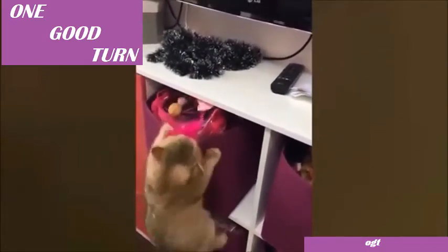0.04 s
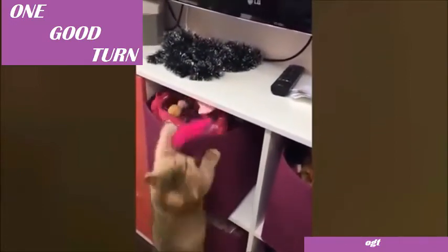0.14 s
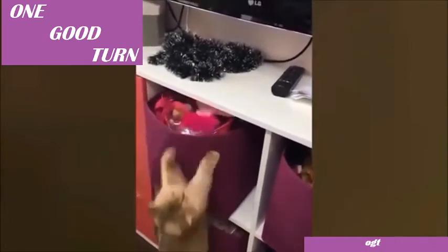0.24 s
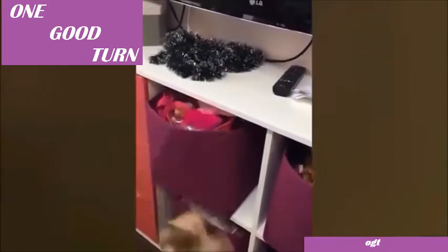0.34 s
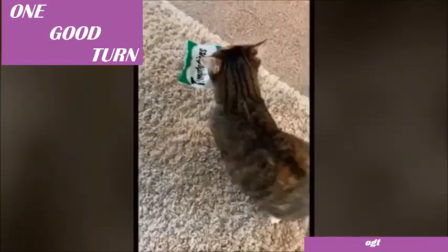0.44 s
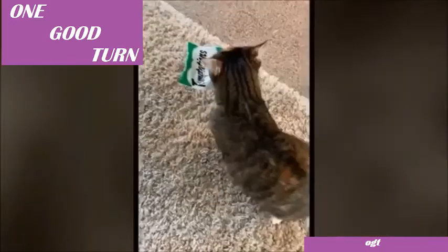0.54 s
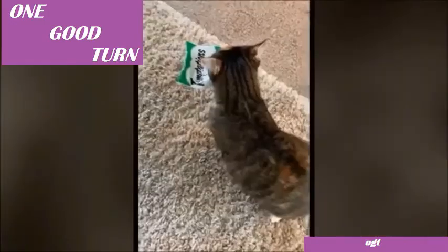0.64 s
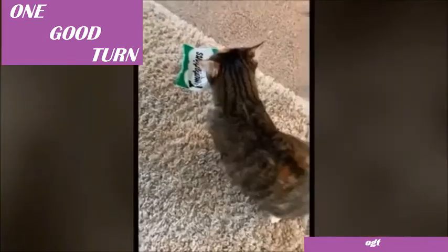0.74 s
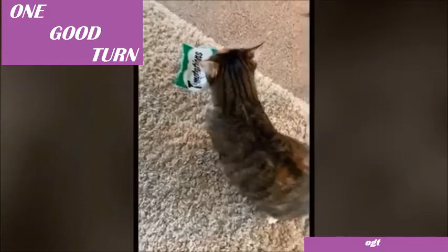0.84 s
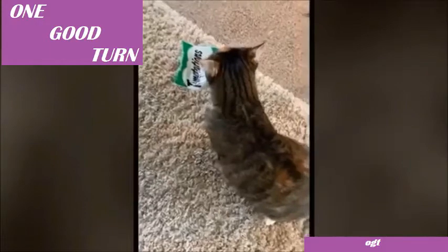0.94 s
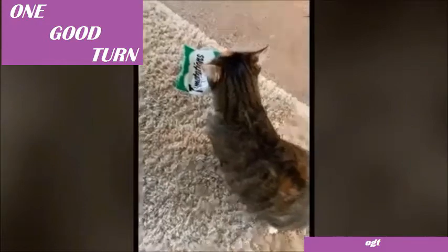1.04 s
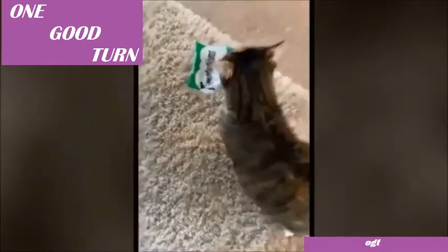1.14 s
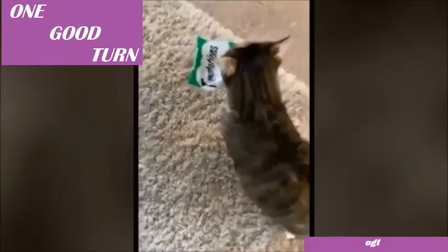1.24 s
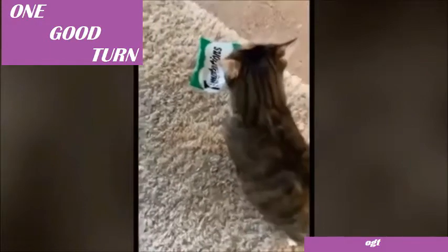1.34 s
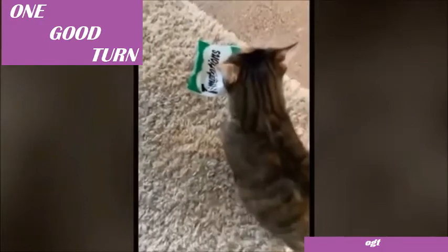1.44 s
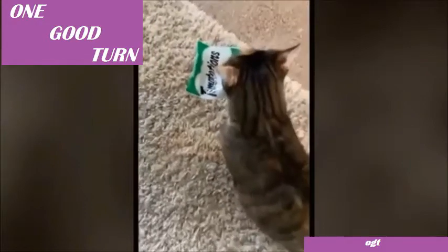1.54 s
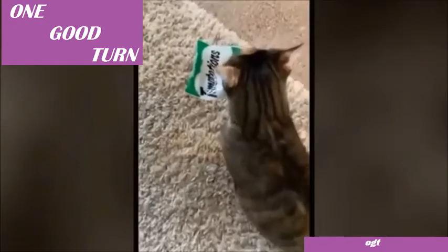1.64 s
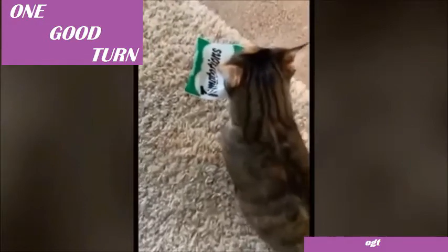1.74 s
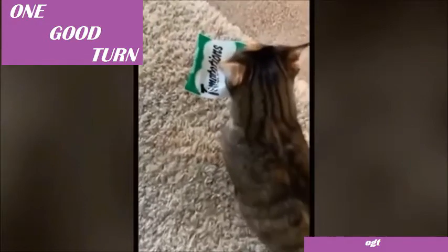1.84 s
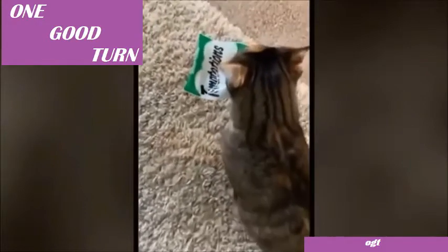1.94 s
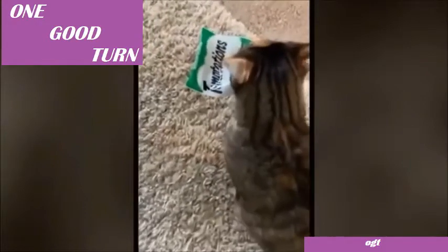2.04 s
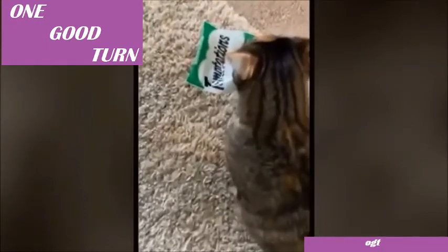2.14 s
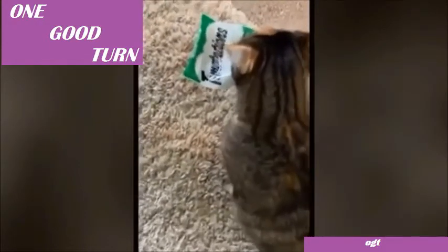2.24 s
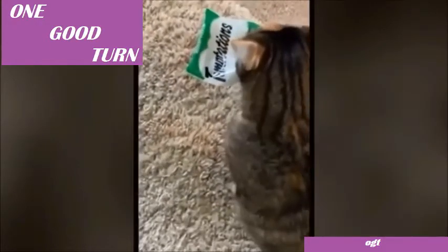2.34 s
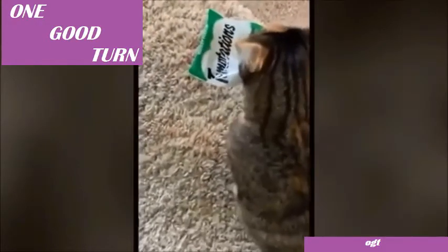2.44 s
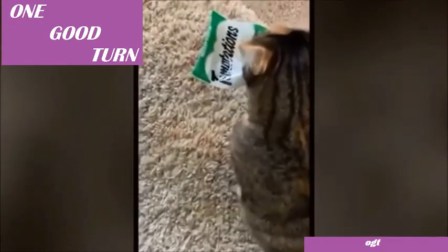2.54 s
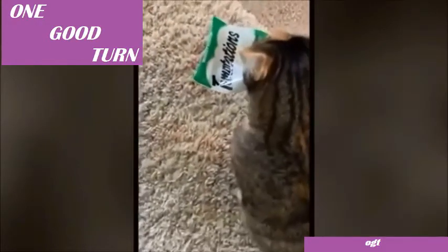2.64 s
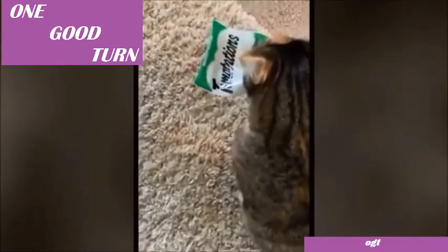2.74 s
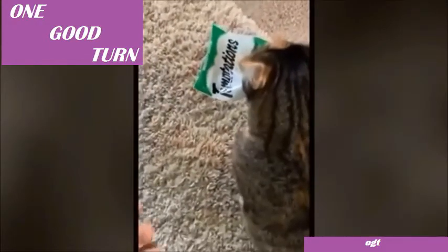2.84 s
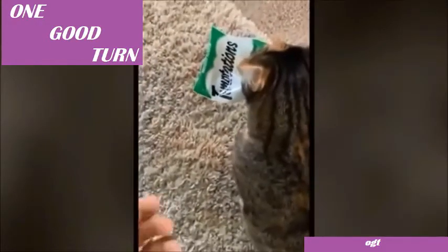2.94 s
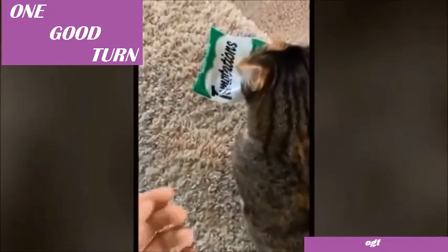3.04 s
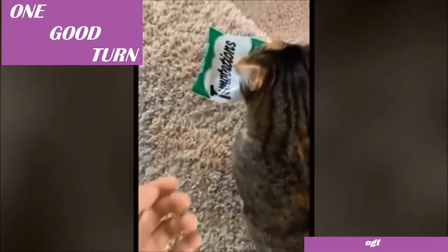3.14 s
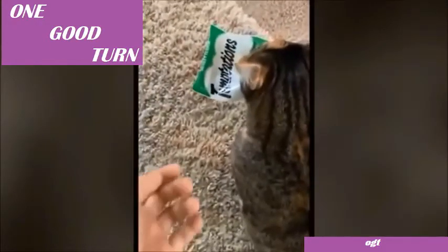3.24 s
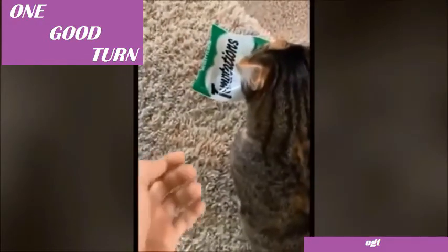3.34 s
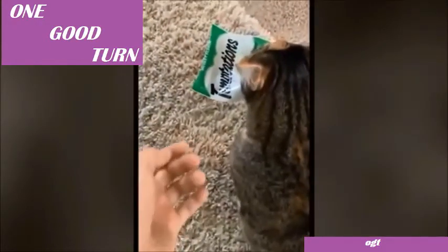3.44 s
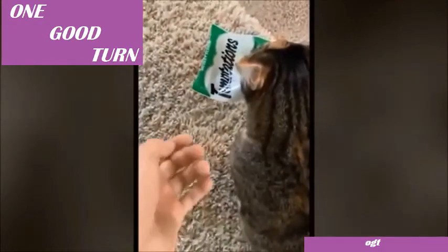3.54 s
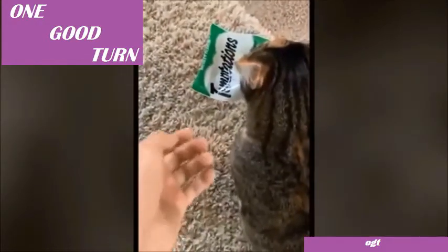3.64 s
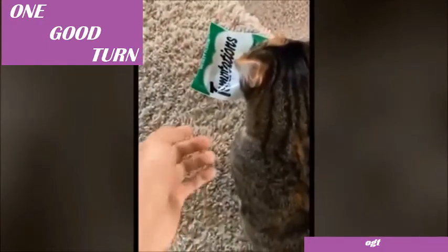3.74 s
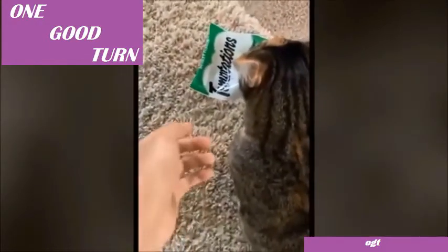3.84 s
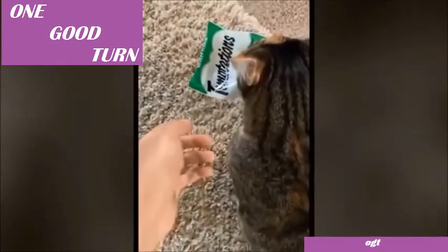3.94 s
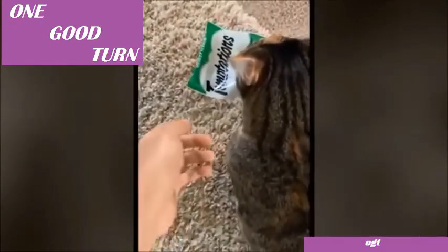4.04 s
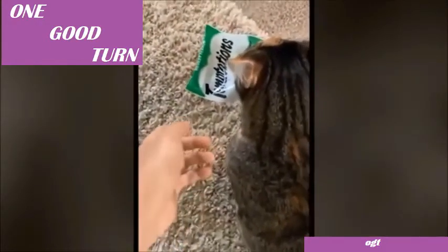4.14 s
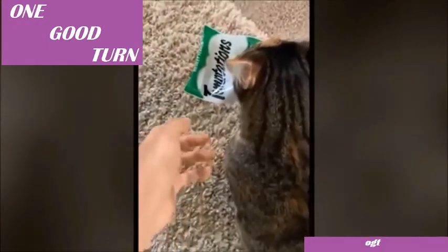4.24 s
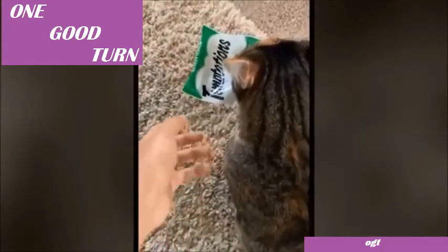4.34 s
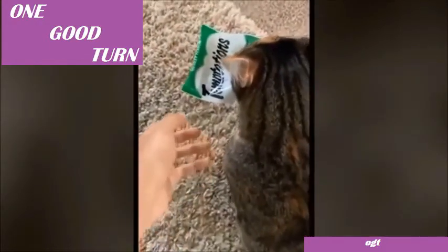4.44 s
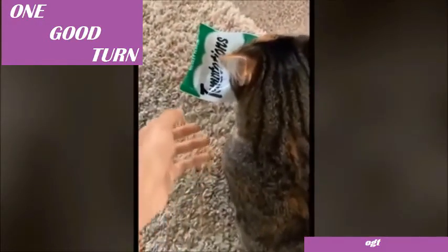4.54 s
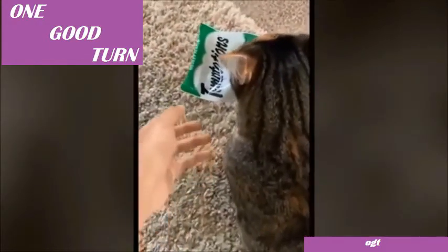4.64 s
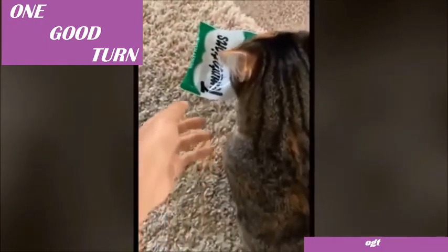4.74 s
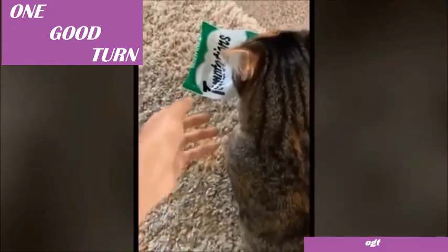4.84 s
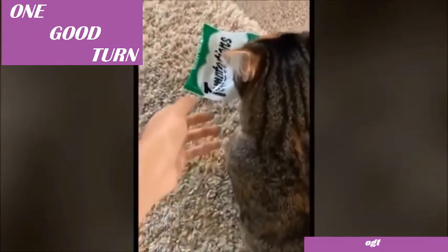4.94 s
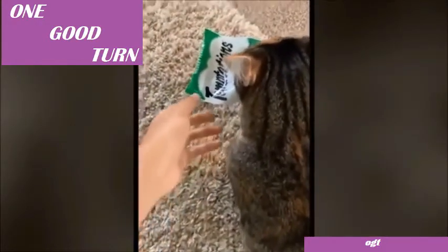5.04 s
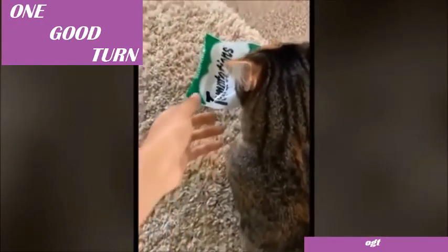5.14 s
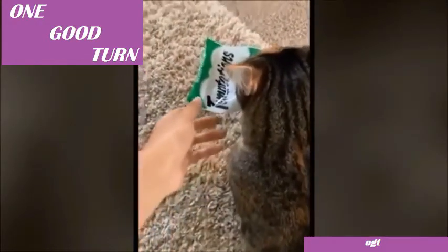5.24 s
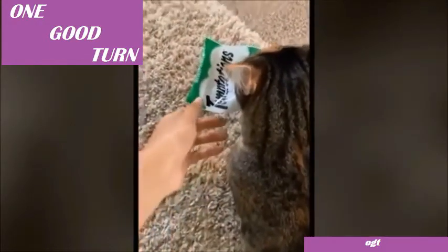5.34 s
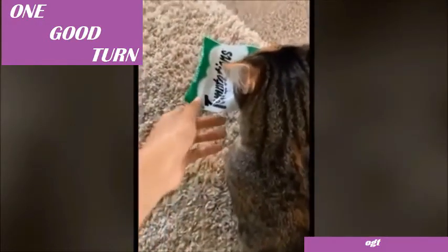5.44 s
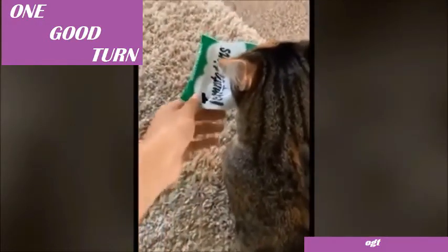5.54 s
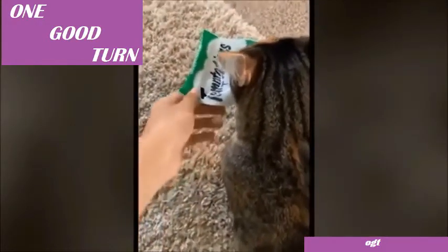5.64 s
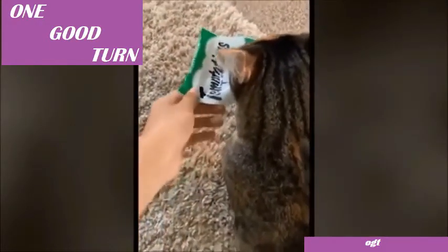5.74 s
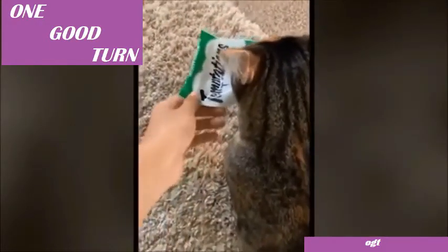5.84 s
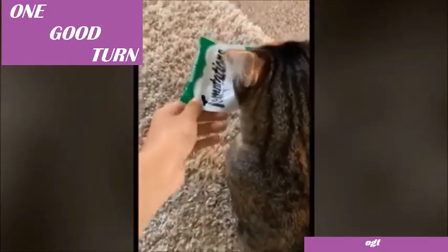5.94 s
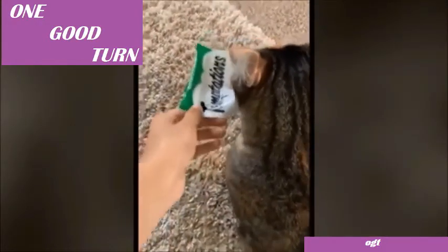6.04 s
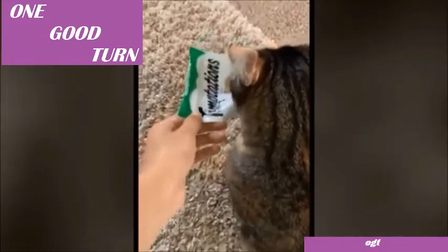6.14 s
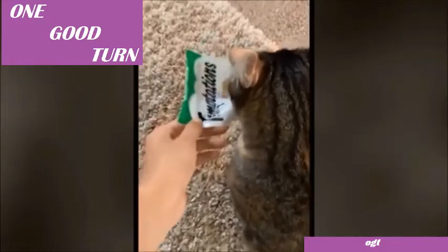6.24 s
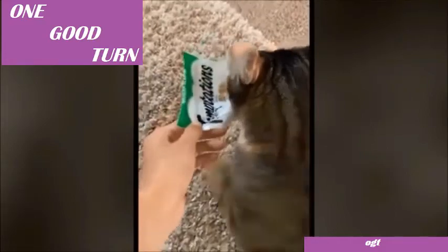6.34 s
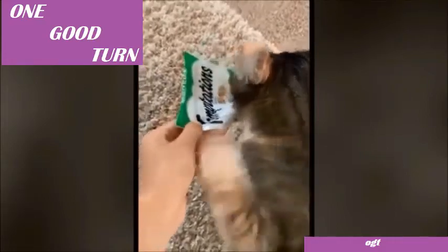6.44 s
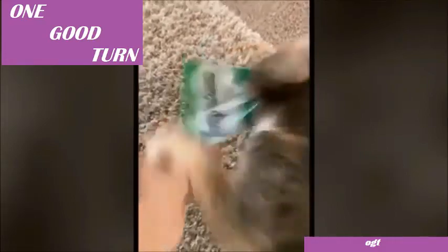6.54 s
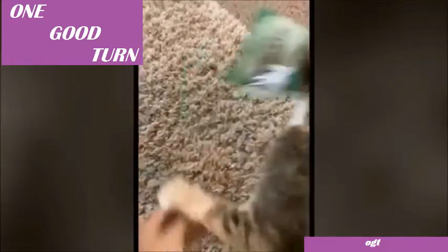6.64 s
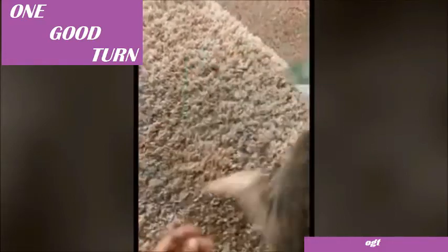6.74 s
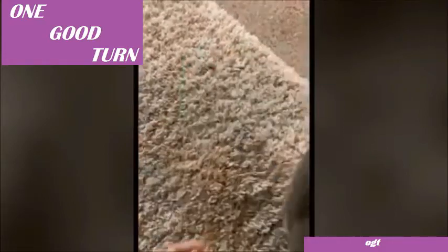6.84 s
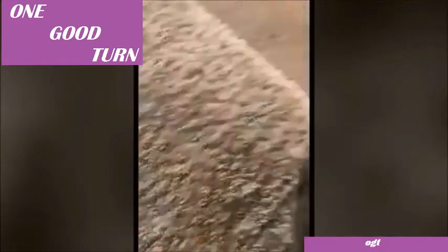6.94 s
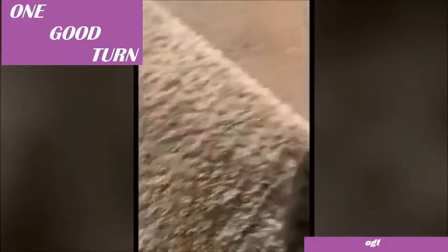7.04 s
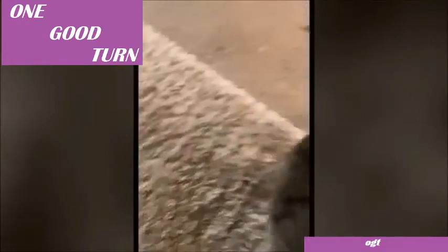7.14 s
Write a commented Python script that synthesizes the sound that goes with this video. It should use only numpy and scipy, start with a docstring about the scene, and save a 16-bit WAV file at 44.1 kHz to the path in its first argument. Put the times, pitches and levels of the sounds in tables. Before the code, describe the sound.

Silence until about 0.5 s, when sound cuts in abruptly: faint low house rumble, thin hiss, and a cat's growl already under way. Close and dry in a small soft room, the growl is low, throaty and buzzing, with a rapid rattling pulse and a little airy snarl. It holds nearly level, with brief upward catches around 2.2, 2.4 and 3 s, sinking slightly after 3.4 s. At 4.4 s it jumps up into a weak, wavering closed-mouth groan, gone by 5 s. Near-quiet follows, with a dull fingertip knock on plastic at 5.4 s. From 5.9 s the bag snaps and rustles while a rougher, angrier growl rises, peaking around 6.35 s. At 6.4 to 6.5 s a swat crunches the bag in a dense, bright crackle with a soft thump. Another tiny thump and ticks follow near 6.6 s, as the growl turns irregular and moaning, weakening towards 7 s.

```python
"""Half a second of silence, then a cat's long low growl over faint rumble and hiss; it thins into a groan.
A hand rustles and knocks on a plastic bag; a rougher growl rises and the cat swats the bag with a crunch.
Growl: a hum of three partials plus two slaps a cycle that ring the throat; flapping adds irregular beats.
Bag: dispersive snaps and a knock, a swarm of creases ringing the bag, and decaying sines for two thumps.
Decaying noise makes the small soft room; shaped noise makes the rumble and hiss."""
import sys
import numpy as np
from scipy import signal
from scipy.fft import rfft, irfft
from scipy.io import wavfile

SR = 44100
rng = np.random.default_rng(int(sys.argv[2]) if len(sys.argv) > 2 else 0)


def dump(signal):
    """Clip the signal to [-1, 1] and save it as 16-bit WAV at the path in sys.argv[1]."""
    limited = np.clip(np.atleast_2d(signal).T, -1, 1)
    pcm = np.round(limited * 32767).astype(np.int16)
    wavfile.write(sys.argv[1], SR, pcm)


N = 317520
TIME = np.arange(N) / SR
BINS = np.fft.rfftfreq(N, 1 / SR)


def gain_of(db):
    """Logarithmic level: 20 dB is a factor of ten in amplitude."""
    return 10 ** (np.asarray(db) / 20)


def evened(x):
    """Power normalization: scales a signal to rms 1."""
    return x / np.sqrt(np.mean(x ** 2) + 1e-20)


def read(points, hz):
    """Spectral interpolation: reads a table in straight lines on a log-frequency axis."""
    f, value = np.transpose(points)
    return np.interp(np.log(hz + 1), np.log(f + 1), value)


def follow(rows):
    """Piecewise-linear control: joins each column after the time column by straight lines."""
    s, *columns = np.transpose(rows)
    return [np.interp(TIME, s, column) for column in columns]


def level(s, db):
    """Amplitude contour: a dB curve as gain, fading to zero within 10 ms outside its span."""
    outside_s = np.maximum(s[0] - TIME, TIME - s[-1])
    return gain_of(np.interp(TIME, s, db)) * np.clip(1 - outside_s * 100, 0, 1)


def envelope(start, end, attack_s, release_s, sag_db_per_s=0):
    """Gating: linear attack and release around a level that changes evenly in dB."""
    gate = np.clip(np.minimum((TIME - start) / attack_s, (end - TIME) / release_s), 0, 1)
    return gate * gain_of(sag_db_per_s * (np.clip(TIME, start, end) - start))


def add(mix, s, sound):
    """Superposition: mixes a sound in at time s."""
    part = mix[round(s * SR):][:len(sound)]
    part += sound[:len(part)]


def noise(colour):
    """Spectral shaping: steady noise of a given spectrum, rms 1."""
    return evened(irfft(rfft(rng.standard_normal(N)) * gain_of(read(colour, BINS)), N))


def wander(rate_hz):
    """Low-pass noise: random drift, mostly below the given rate, rms 1."""
    return evened(irfft(rfft(rng.standard_normal(N)) / (1 + (BINS / rate_hz) ** 4), N))


def ring(colour, tilt_db=0, size=4096):
    """Minimum phase: the causal impulse response of a spectrum, tilted in dB per octave, energy 1."""
    hz = abs(np.fft.fftfreq(size, 1 / SR))
    db = np.maximum(read(colour, hz), -80) + tilt_db * np.log2(1 + hz / 1000)
    log_gain = np.log(gain_of(db))
    # the Hilbert transform of the log gain supplies the phase
    response = np.fft.ifft(np.exp(np.conj(signal.hilbert(log_gain)))).real[:size // 2]
    return response / np.linalg.norm(response)


def colour_with(x, colour):
    """Linear filtering: convolves a sound with the response of a spectrum."""
    return signal.oaconvolve(x, ring(colour))[:N]


def resonate(x, hz, width_hz):
    """Moving resonance: shifts the curve hz down to zero, low-passes, and shifts it back; peak gain 1."""
    turn = np.exp(2j * np.pi * np.cumsum(hz) / SR)
    r = np.exp(-np.pi * width_hz / SR)
    return 2 * (turn * signal.lfilter([1 - r], [1, -r], x / turn + 1e-18)).real


# room decay: hz [Hz], t60 [s]
ROOM_DECAY = [(150, 1), (1000, 0.25), (4000, 0.33), (14000, 0.091)]


def room(x):
    """Reverberation: convolution with a diffuse noise tail whose bands decay at their own speed."""
    hz, t, z = signal.stft(rng.standard_normal(SR // 2), SR, nperseg=256)
    decay = np.exp(-np.log(1000) * t / read(ROOM_DECAY, hz)[:, None])
    tail = signal.istft(z * decay, SR, nperseg=256)[1]
    tail[:SR // 200] = 0  # the tail starts 5 ms after the sound
    tail = signal.sosfilt(signal.butter(2, 330, "high", fs=SR, output="sos"), tail)
    return signal.oaconvolve(x, tail / np.linalg.norm(tail))[:N]


# colours of the rumble and of the hiss: hz [Hz], relative_level_db [dB]
ROOM_TONE = [(15, -68), (25, -20), (75, 2.5), (100, -7), (157, -8.5), (190, -19), (366, -20), (528, -26.5),
             (1000, -25.5), (1780, -32.5), (6000, -46), (15000, -59)]
HISS_COLOUR = [(2350, 0), (4000, -3), (4700, -5.5), (6800, -6), (8000, -12.5), (9000, -9), (12900, -10),
               (14500, -10), (15500, -31)]
# course of the hiss: start_s [s], relative_level_db [dB]
HISS = [(.52, -69.5), (.68, -65), (.82, -73.5), (1.03, -65), (1.197, -72.5), (2.03, -72.5), (2.42, -63.5),
        (2.7, -68.5), (3.2, -65.5), (4.499, -74), (5.0, -71.5), (5.549, -76.5), (6.78, -66.5), (7.0, -64),
        (7.2, -61)]


def background(rumble_db=-57, hiss_db=2.5):
    """Stationary and modulated noise: the low rumble of the house and a fine hiss of changing level."""
    hiss = gain_of(hiss_db) * level(*np.transpose(HISS)) * noise(HISS_COLOUR)
    return gain_of(rumble_db) * noise(ROOM_TONE) + hiss


def pulses(turns, spread_db):
    """Periodic excitation: one click of uneven strength at every whole turn."""
    return np.diff(np.floor(turns), prepend=np.floor(turns[0])) * gain_of(spread_db * wander(115))


def slap(turns, rough, spread_db, puff_turns):
    """Glottal excitation: once a cycle the folds slap unevenly and let out a decaying puff of air."""
    puffs = evened(np.exp(-(turns % 1) / puff_turns) * rng.standard_normal(N))
    # the slap itself is soft, so the top of the treble is nearly all air
    soft = signal.butter(2, 2300, fs=SR, output="sos")
    clicks = signal.sosfilt(soft, evened(pulses(turns, 0)))
    rough = np.clip(rough, 0, 1)
    return ((1 - rough) * clicks + rough * puffs) * gain_of(spread_db * wander(126))


# lips draw back in the long growl: start_s [s], level_db [dB against the sharp slap before its gain],
# resonance_hz [Hz]
SNARL = [(0.522, -18.5, 3680), (1.25, -14, 3670), (1.45, -7.5, 3560), (2.25, -4, 3475), (2.45, -17, 3400),
         (2.7, -15.5, 3640), (3.2, -16, 3580), (3.6, -23, 3610), (4.457, -13, 3610)]
# colour of the air between the teeth: hz [Hz], relative_level_db [dB]
LIPS_COLOUR = [(1500, -14.5), (2100, -13.5), (2450, -8), (3100, -17.5), (3800, -13), (4200, -35),
               (8000, -68)]


def snarl(turns, slap_db, ring_db=15, width_hz=75):
    """Turbulence: pulsing air through bared teeth excites a treble resonance that drifts with the lips."""
    s, db, hz = np.transpose(SNARL)
    air = colour_with(slap(turns, .5, slap_db, .35), LIPS_COLOUR)
    ringing = resonate(air, np.interp(TIME, s, hz), width_hz)
    return level(s, db) * evened(air + gain_of(ring_db) * ringing)


# how strongly the body radiates a partial of the hum: hz [Hz], radiation_db [dB]
BODY = [(110, -41.5), (123, -44), (136, -40.5), (190, -40.5), (233, -40.5), (248, -44), (275, -45.5),
        (300, -52), (380, -68)]
# a wider mouth strengthens both slaps: dB per Hz of mouth resonance above its rest
MOUTH_REST_HZ, SHARP_DB_PER_HZ, DULL_DB_PER_HZ = 1079, 0.0253, 0.0177
# slow pitch waver: rms share of pitch, top rate in Hz
WAVER, WAVER_HZ = .004, 10


def growl(pitch, effort_db, lean_db, rasp_db, mouth, uppers, throat, jitter, shimmer, rough, slap_db,
          sharp_spread_db, puff_turns, dull_turn, sharp_turn, mouth_db, sharp_db, third_db, flutter_db,
          width_hz, split_hz=1150, upper_width_hz=38):
    """Source and filter: slow folds hum in three partials and slap twice a cycle, ringing the throat."""
    # lean_db favours the octave over the fundamental
    low = gain_of(effort_db - lean_db + read(BODY, pitch))
    octave = gain_of(effort_db + lean_db + read(BODY, 2 * pitch))
    unevenness = 1 + jitter * wander(55) + WAVER * wander(WAVER_HZ)
    turns = np.cumsum(pitch * unevenness) / SR
    hum = low * np.cos(2 * np.pi * turns) * (1 + shimmer * wander(55))
    hum += octave * np.sin(4 * np.pi * turns) * (1 + shimmer * wander(50))
    hum -= gain_of(third_db) * octave * np.cos(6 * np.pi * turns)

    # the dull slap rings the low throat and the mouth
    dull = colour_with(slap(turns - dull_turn, rough, slap_db, puff_turns), throat)
    dull = signal.sosfilt(signal.butter(3, split_hz, fs=SR, output="sos"), dull)
    dull = evened(dull + gain_of(mouth_db) * resonate(dull, mouth, width_hz))

    # the sharp slap carries more air and rings the upper resonances (Hz, dB)
    sharp = colour_with(slap(turns - sharp_turn, rough + .1, sharp_spread_db, puff_turns), throat)
    sharp = signal.sosfilt(signal.butter(2, split_hz, "high", fs=SR, output="sos"), sharp)
    ringing = sum(gain_of(db) * resonate(sharp, hz, upper_width_hz) for hz, db in uppers)
    sharp = evened(sharp + ringing)
    sharp += snarl(turns - sharp_turn, sharp_spread_db)

    opening_hz = mouth - MOUTH_REST_HZ
    sharp *= gain_of(sharp_db + SHARP_DB_PER_HZ * opening_hz)
    dull *= gain_of(DULL_DB_PER_HZ * opening_hz)

    # uneven cycles fill the gaps between the low partials: (Hz, dB)
    flutter = noise([(30, -24), (60, -55), (85, 4.5), (180, 4.0), (300, 3.5), (420, -28), (700, -63)])
    flutter *= gain_of(flutter_db) * np.hypot(low, octave)
    return np.sqrt(2) * hum + gain_of(rasp_db) * (dull + sharp) + flutter


# throat colour of the calm growl and the groan: hz [Hz], relative_level_db [dB]
CALM_THROAT = [(190, -9), (330, -2.5), (375, 1), (440, 3), (495, 4), (560, -3.5), (640, -1), (800, -4),
               (1000, -1), (1200, -3.5), (1380, -4), (1580, -4.5), (1710, -8), (1860, -12.5), (2100, -21.5),
               (3150, -19.5), (3600, -13), (4150, -32), (5000, -23.5), (8000, -66)]
# pitch before the catches: start_s [s], pitch_hz [Hz]
CALM_PITCH = [(0.518, 124.1), (1.15, 122.6), (1.548, 123.8), (1.759, 121.5), (1.879, 126.4), (2.07, 121.6),
              (2.279, 121.2), (2.55, 125.7), (2.698, 120.8), (3.219, 122.3), (3.438, 113.6), (3.72, 112.8),
              (3.919, 117.4), (4.241, 112.4), (4.32, 123.6), (4.46, 127.1)]
# mouth opening and closing: start_s [s], mouth_hz [Hz], second_resonance_hz [Hz], second_strength_db [dB]
CALM_MOUTH = [(.52, 954, 1540, -6), (.75, 966, 1500, 1), (.88, 945, 1330, 6.5), (1.28, 974, 1340, 8),
              (1.38, 980, 1470, 7), (1.6, 1040, 1544, 11), (1.85, 1040, 1435, 2), (2.33, 1048, 1425, 11),
              (2.39, 916.4, 1460, -20), (2.54, 930, 1470, 1), (2.61, 1050, 1530, 4), (2.91, 1045, 1460, 2),
              (2.96, 961, 1486, 4), (3.05, 1040, 1470, 3), (3.33, 950, 1455, 5), (3.42, 954, 1282, 6),
              (3.87, 890, 1256, 9), (3.97, 1102, 1520, 6), (4.44, 1082, 1278, -2)]
# a third resonance of the throat, its pitch and strength shifting through the growl:
# start_s [s], resonance_hz [Hz], strength_db [dB]
CALM_RING = [(.52, 1780, -6), (1.3, 1790, 10), (1.6, 1620, -2), (2.2, 1650, 7.5), (2.8, 1630, 6),
             (3.2, 1670, 3), (3.5, 1665, 6.5), (4.44, 1645, 8.5)]
# the hum's third partial, strongest mid-growl: start_s [s], level_db [dB against the octave]
CALM_THIRD = [(.52, -29), (1.35, -37), (1.7, -17), (2.6, -16.5), (3.3, -20.5), (3.6, -23), (4.44, -21)]
# push: start_s [s], hum_effort_db [dB], octave_lean_db [dB], rasp_db [dB before the catches]
CALM_EFFORT = [(.52, -0.2, -2, -48), (1.15, 0, -1.5, -47), (1.35, 0.5, -1, -48), (2.1, -1.5, -0.5, -48),
               (2.4, -0.5, 0.5, -48), (2.6, -0.2, -0.5, -45.5), (2.95, -2.5, 0.8, -49.5),
               (3.22, -1, 1.5, -46), (3.4, -3, 2, -47.5), (3.75, -3, 2.5, -48), (3.92, -2, 3, -48.5),
               (4.06, -5.5, 3, -49.5), (4.44, -1, 2.5, -51)]
# the throat tightens for a moment: peak_s [s], length_s [s], pitch_lift_hz [Hz]
CATCHES = [(2.17, 0.16, 8.7), (2.419, 0.22, 14.4), (2.98, .12, 14.2), (4.345, 0.0554, 8.3),
           (4.446, 0.11, 9.6)]


def calm_growl(catch_rise=.42, catch_rasp_db_per_hz=0.01):
    """Phonation with pitch catches: one long growl whose hum slowly leans toward its octave."""
    start, end = CALM_PITCH[0][0], CALM_PITCH[-1][0]
    (pitch,), (third_db,) = follow(CALM_PITCH), follow(CALM_THIRD)
    mouth, second, second_db = follow(CALM_MOUTH)
    effort_db, lean_db, rasp_db = follow(CALM_EFFORT)
    lift = np.zeros(N)
    for s, length, hz in CATCHES:
        # each catch rises for a share catch_rise of its length, then falls
        corners = [s - catch_rise * length, s, s + (1 - catch_rise) * length]
        lift += np.interp(TIME, corners, [0, hz, 0])
    voice = growl(
        pitch + lift, effort_db, lean_db, rasp_db + catch_rasp_db_per_hz * lift,
        mouth, [(second, second_db), follow(CALM_RING)], CALM_THROAT,
        # unevenness: rms shares of pitch and hum level, share of air, slap spreads in dB, puff in turns
        jitter=.017, shimmer=.07, rough=.31, slap_db=.7, sharp_spread_db=1.4, puff_turns=.75,
        dull_turn=0.475, sharp_turn=0.1187, mouth_db=7.5, sharp_db=-6.5, third_db=third_db,
        flutter_db=-13.0, width_hz=79)
    return envelope(start, end, attack_s=0.0023, release_s=0.031) * voice


# rustle under the fingers, then crumpling under the paw: start_s [s], length_s [s],
# drive_db [dB at the start, before attack and filtering]
CRUMPLES = [(2.106, .028, -58), (5.946, 0.055, -53), (6.374, 0.04, -36.5), (6.405, 0.03, -24.5),
            (6.428, 0.068, -23.5)]
# colour of the crumpling film: hz [Hz], relative_level_db [dB]
CRUNCH_COLOUR = [(120, -40), (200, -3.5), (315, 2.5), (488, -9), (653, -3.5), (755, -10), (858, -9.5),
                 (1050, -9), (1620, -15.5), (1780, -15), (2850, -5), (4030, -10), (6960, -13.5),
                 (12700, -18), (15500, -22)]
# resonances of the air-filled bag: resonance_hz [Hz], width_hz [Hz], relative_level_db [dB]
BAG_MODES = [(610, 110, -11), (905, 130, 3), (1230, 92, 13), (1620, 100, 16.5), (2100, 110, 5)]


def crunch(per_s=1500, spread_db=6.0, body_db=-3, count=6):
    """Random impulse train: creases in several patches of film, each with its shiver, ring the bag."""
    creases = np.zeros(N)
    for _ in range(count):
        hits = rng.random(N) < per_s / SR
        strength = gain_of(spread_db * np.minimum(rng.exponential(1, N), 3))
        clicks = hits * rng.choice([-1, 1], N) * strength
        shiver = rng.standard_normal(SR // 1000) * np.hanning(SR // 1000)  # 1 ms
        creases += signal.oaconvolve(clicks, evened(shiver))[:N]
    # every crumple builds quickly, eases as the film gives way, and stops
    force = np.zeros(N)
    for s, length, db in CRUMPLES:
        force += gain_of(db) * envelope(s, s + length, 0.015, 0.009, sag_db_per_s=-230)
    film = colour_with(evened(creases) * force, CRUNCH_COLOUR)
    body = sum(gain_of(db + body_db) * resonate(film, np.full(N, hz), width) for hz, width, db in BAG_MODES)
    return film + body


def pop(shiver, shiver_s, lag_s, corner_hz, size=2048):
    """Bending-wave dispersion: a click and its noisy shiver arrive treble first, bass last."""
    t, hz = np.arange(size) / SR, np.fft.rfftfreq(size, 1 / SR)
    crack = (t == 0) + shiver * rng.standard_normal(size) * np.exp(-t / shiver_s)
    turns = lag_s * corner_hz * np.arctan(hz / corner_hz)
    return irfft(rfft(crack) * np.exp(2j * np.pi * (turns[-1] - turns)), size)


# creases snapping: start_s [s], relative_level_db [dB], treble_tilt [dB per octave]
SNAPS = [(2.112, -38, -9), (5.4172, -37, -3), (5.4255, -49, 2), (5.9355, -16.5, 5), (6.0070, -20.5, 0.5),
         (6.131, -22, -6), (6.2290, -20.5, -3.5), (6.2654, -17.5, -4), (6.2901, -24, 0.5),
         (6.389, -18, 3.5), (6.3931, -22, 11), (6.4110, -13, -4), (6.4150, -11.5, 7), (6.4180, -24, 4),
         (6.4197, -21, 8), (6.4354, -10.5, 4), (6.4395, -7.5, 2.5), (6.443, -20, 5.5), (6.448, -18, 2),
         (6.4525, -23, 3), (6.4556, -23, -10), (6.4613, -16, -2), (6.4781, -22, 1), (6.487, -11.5, 8),
         (6.4913, -15.5, 13), (6.6648, -21.5, 1), (6.669, -31, 4), (6.678, -27, -2.5)]
# colour of the plastic film before the tilt: hz [Hz], relative_level_db [dB]
SNAP_COLOUR = [(120, -17), (200, 10.5), (380, 8.5), (690, -1.5), (906, -3), (1330, 2.5), (1810, 3),
               (3680, -2.5), (5200, -9.5), (6300, -10.5), (7500, -11.5), (9500, -12.5), (15500, -29)]


def snaps(snap_db=3):
    """Impulse response: each single crease is a dispersed pop filtered by the film."""
    out = np.zeros(N)
    for s, db, tilt_db in SNAPS:
        crack = pop(.21, .0024, lag_s=.007, corner_hz=500)
        add(out, s, gain_of(db + snap_db) * signal.fftconvolve(crack, ring(SNAP_COLOUR, tilt_db)))
    return out


# pitch of the closed-mouth groan: start_s [s], pitch_hz [Hz]
GROAN_PITCH = [(4.44, 170.5), (4.53, 194), (4.585, 172.1), (4.61, 143.9), (4.67, 143.7), (4.72, 162),
               (4.79, 132), (4.86, 121.2), (4.93, 171)]


def groan(end_s=4.955, mouth_hz=945, rasp_db=-54, rasp_db_per_hz=-0.0654):
    """Weak phonation: the mouth closes on a wavering groan, less raspy where it is higher."""
    (pitch,) = follow(GROAN_PITCH)
    voice = growl(
        pitch, effort_db=-2, lean_db=0.1, rasp_db=rasp_db + rasp_db_per_hz * (pitch - pitch.min()),
        mouth=np.full(N, mouth_hz), uppers=[], throat=CALM_THROAT,
        jitter=.035, shimmer=.2, rough=.35, slap_db=1.6, sharp_spread_db=1.6, puff_turns=.9,
        dull_turn=0.42, sharp_turn=0.045, mouth_db=4, sharp_db=-34, third_db=-33,
        flutter_db=-10.5, width_hz=70)
    start = GROAN_PITCH[0][0]
    return envelope(start, end_s, attack_s=0.012, release_s=0.096, sag_db_per_s=-6.0) * voice


# colour of the fingertip's knock: hz [Hz], relative_level_db [dB]
KNOCK_COLOUR = [(120, -16), (200, -8), (295, 4.5), (450, -16), (700, -3), (950, -7.5), (1300, 2),
                (1800, -1), (2400, -6), (3600, -7), (4200, -23), (5800, -13), (14000, -28)]


def knock(start_s=5.3697, level_db=-11.5, room_db=-12, dull_hz=2300):
    """Dispersed impact: a fingertip's duller knock; mainly its low part comes back from the room."""
    out = np.zeros(N)
    tap = pop(0.099, 0.0023, lag_s=.0125, corner_hz=450)
    add(out, start_s, gain_of(level_db) * signal.fftconvolve(tap, ring(KNOCK_COLOUR)))
    low_part = signal.sosfilt(signal.butter(3, dull_hz, fs=SR, output="sos"), out)
    return out + gain_of(room_db) * room(low_part)


# throat colour of the angry growl: hz [Hz], relative_level_db [dB]
ANGRY_THROAT = [(190, -8), (300, -2), (360, -2.5), (460, 6), (600, 0), (740, -4), (830, -1.5), (970, -0.5),
                (1100, -7), (1350, -6.5), (1680, -6.5), (1950, -21), (3030, -19), (3750, -11.5),
                (4300, -24), (8000, -80)]
# course of the anger: start_s [s], pitch_hz [Hz], hum_effort_db [dB], rasp_db [dB]
ANGER = [(5.961, 100.1, -15, -56), (6.0, 109.4, -2, -44), (6.05, 117.8, 2.5, -42), (6.11, 117.7, 1, -41),
         (6.145, 131.7, 6, -40.5), (6.19, 138.2, 5, -38.5), (6.27, 134.4, 4, -41.5),
         (6.34, 147.3, 10.5, -36), (6.39, 145.3, 10, -37.5), (6.49, 143.5, -1, -43.5),
         (6.58, 146.2, 11.5, -44), (6.6, 145.7, -2, -47.5), (6.65, 136.3, 2, -47), (6.7, 136.1, -5, -45),
         (6.77, 120.1, 2.5, -50), (6.815, 140, 3, -45.5), (7.03, 129.5, 3.5, -52), (7.2, 128.4, 4, -53)]
# mouth resonance in the angry growl, opening widest after the swat, then closing:
# start_s [s], mouth_hz [Hz], second_resonance_hz [Hz]
ANGRY_MOUTH = [(5.96, 954, 1610), (6.33, 917, 1680), (6.45, 964, 1503), (6.6, 1040, 1370),
               (6.7, 1130, 1390), (6.77, 1210, 1446), (6.82, 862, 1390), (7.2, 867.6, 1393)]


def angry_growl(facing_db=2, turned_db=-4, turn_s=6.13, turn_length_s=0.42, upper_db=2):
    """Effortful phonation: a louder, rougher growl; its hum loses the octave as the cat turns away."""
    pitch, effort_db, rasp_db = follow(ANGER)
    mouth, second = follow(ANGRY_MOUTH)
    lean_db = np.interp(TIME, [turn_s, turn_s + turn_length_s], [facing_db, turned_db])
    voice = growl(
        pitch, effort_db, lean_db, rasp_db, mouth, [(second, upper_db)], ANGRY_THROAT,
        jitter=.023, shimmer=.08, rough=.32, slap_db=1.3, sharp_spread_db=1.8, puff_turns=.5,
        dull_turn=0.3275, sharp_turn=0.57, mouth_db=7.0, sharp_db=-9.0, third_db=-10,
        flutter_db=-15, width_hz=150)
    return (TIME > ANGER[0][0]) * voice


# tones of two soft thumps, at the crunch and just after: start_s [s], level_db [dB], pitch_hz [Hz], t60 [s]
THUMPS = [(6.436, -21.5, 222.7, 0.13), (6.594, -25, 510, 0.035), (6.597, -28, 1000, 0.015),
          (6.598, -35.5, 1330, 0.04)]


def thumps():
    """Damped oscillation: each tone of the two thumps is an exponentially decaying sine."""
    out, t = np.zeros(N), np.arange(SR // 5) / SR
    for s, db, hz, t60 in THUMPS:
        add(out, s, gain_of(db) * np.exp(-np.log(1000) * t / t60) * np.sin(2 * np.pi * hz * t))
    return out


# folds losing their beat: start_s [s], moan_level_db [dB], throat_hz [Hz], throat_strength_db [dB]
FLAPPING = [(6.48, -39, 430, 0), (6.575, -44, 444, 18), (6.6, -35, 560, 10), (6.655, -39, 532, 2),
            (6.7, -36, 540, 11), (6.77, -37.5, 513, -3), (6.82, -49, 494, 7), (7.2, -50, 560, 4)]


def flapping(width_hz=28, mouth_db=-10, second_db=-6, mouth_width_hz=85):
    """Aperiodic excitation: irregular beats make a narrow throat resonance moan and the mouth ring."""
    beats = pulses(np.cumsum(105 * np.exp(.22 * wander(70))) / SR, 1.7)
    thud_colour = [(50, -57), (100, -5.0), (200, 0.5), (280, -10.5), (340, -11.5), (420, -14.0),
                   (520, -9.5), (700, -33.5), (1200, -17), (2000, -63.0)]  # (Hz, dB)
    thuds = colour_with(beats, thud_colour)
    s, db = np.transpose(FLAPPING)[:2]
    _, hz, moan_db = follow(FLAPPING)
    mouth, second = follow(ANGRY_MOUTH)
    # two equal resonances in a row sharpen the peak
    throat = resonate(resonate(thuds, hz, 2 * width_hz), hz, 2 * width_hz)
    moan = evened(thuds + gain_of(moan_db) * throat)
    cry = resonate(beats, mouth, mouth_width_hz)
    cry += gain_of(second_db) * resonate(beats, second, mouth_width_hz)
    cry = evened(signal.sosfilt(signal.butter(3, [700, 1700], "band", fs=SR, output="sos"), cry))
    return level(s, db) * (moan + gain_of(mouth_db) * cry)


def scene():
    """Direct and reverberant sound: cat and bag close by, with a fainter return from the room."""
    cat = calm_growl() + groan() + angry_growl() + flapping()
    cat += gain_of(-14) * room(cat)
    bag = snaps() + crunch() + thumps()
    bag += gain_of(-13.0) * room(bag)
    return (cat + bag + knock() + background())[None]


def record(dry, start_s=.519, edge_hz=15000, ceiling=.28):
    """Saturation and band limiting: peaks are rounded, sound cuts in from silence, the top is removed."""
    cut_in = np.clip((TIME - start_s) * 1000, 0, 1)  # 1 ms
    rounded = ceiling * np.tanh(dry / ceiling)
    low_pass = signal.firwin(141, edge_hz, window=("kaiser", 9), fs=SR)
    return signal.oaconvolve(rounded * cut_in, low_pass[None], "same")


dry = scene()
out = record(dry)
dump(out)
```